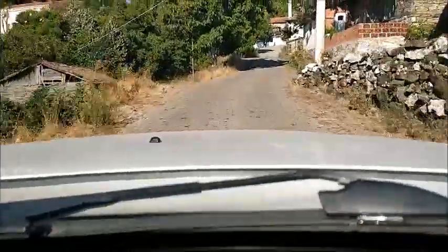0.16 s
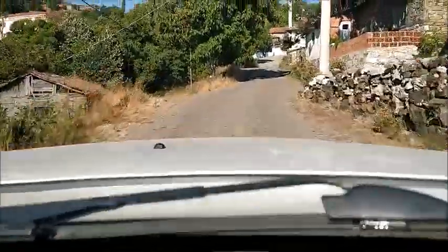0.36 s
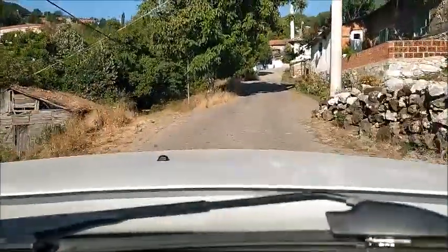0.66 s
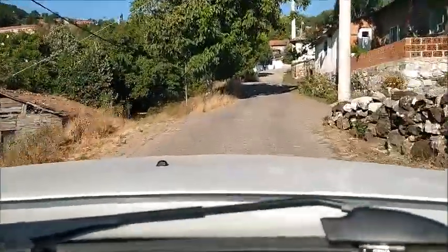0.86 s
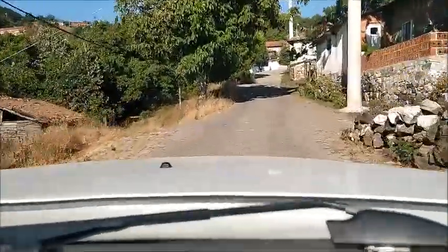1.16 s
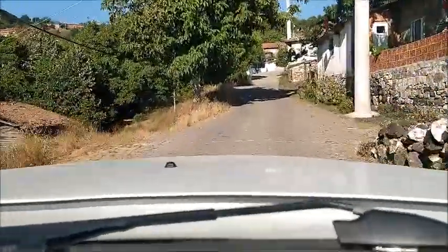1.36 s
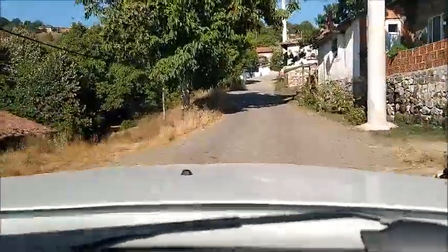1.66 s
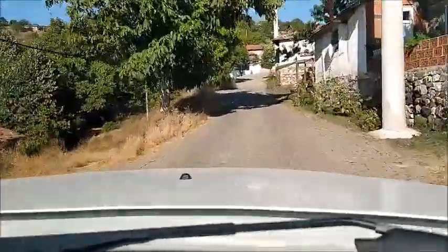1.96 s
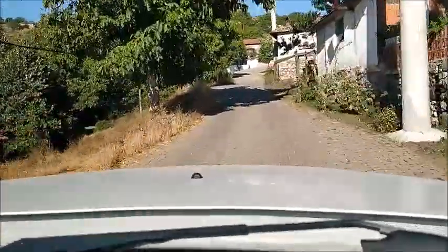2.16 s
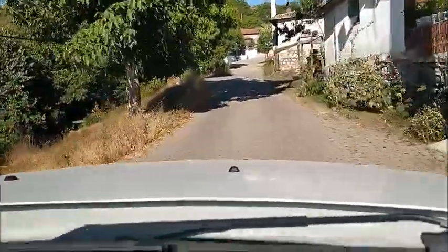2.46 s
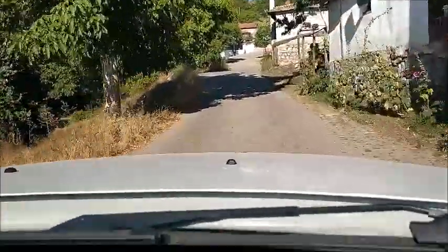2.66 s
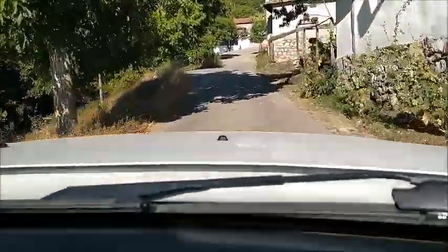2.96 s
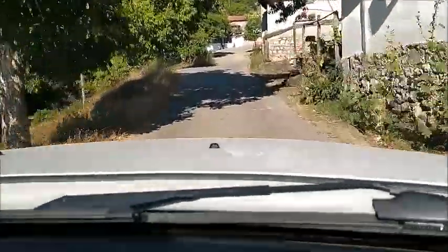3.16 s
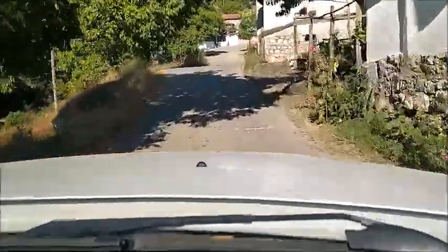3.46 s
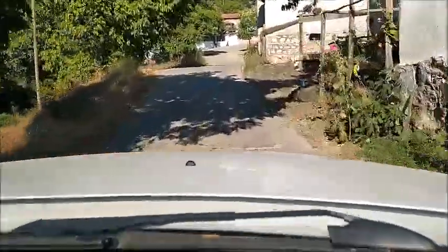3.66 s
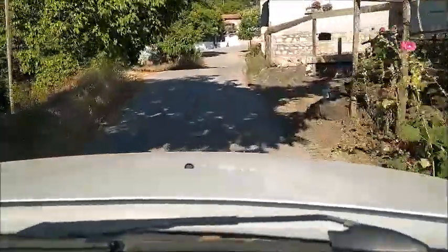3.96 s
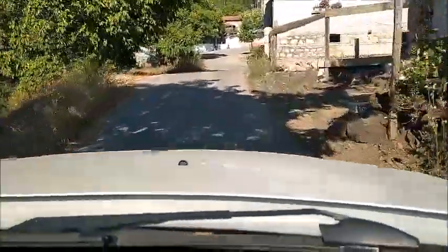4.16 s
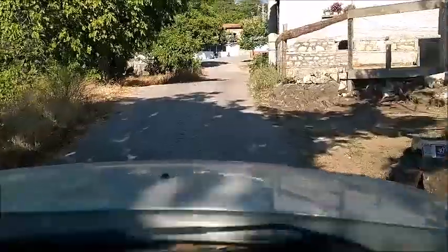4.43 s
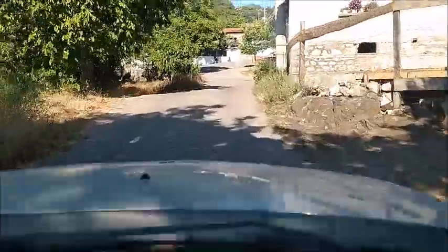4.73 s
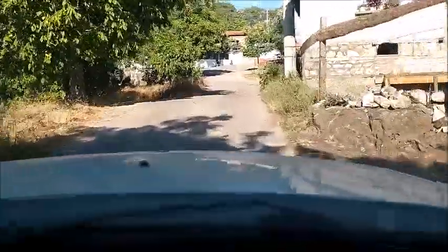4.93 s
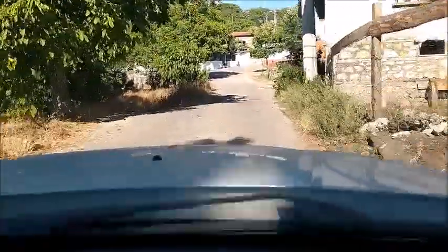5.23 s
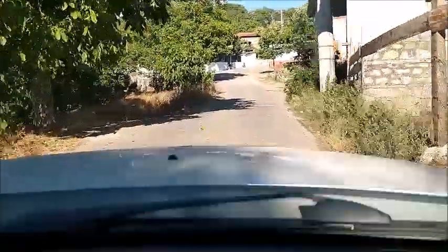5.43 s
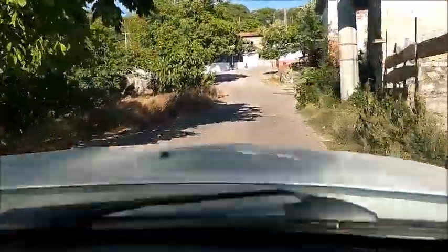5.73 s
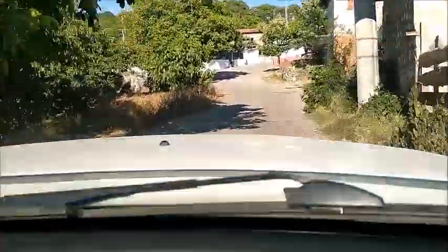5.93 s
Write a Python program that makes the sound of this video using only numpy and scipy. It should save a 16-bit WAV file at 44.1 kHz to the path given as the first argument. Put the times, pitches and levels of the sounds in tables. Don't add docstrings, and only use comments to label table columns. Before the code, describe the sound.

Deep cabin rumble of a car creeping over uneven stones, with soft suspension thuds, small plastic rattles, and a thin buzz at the end.

```python
import sys
import numpy as np
from scipy import signal
from scipy.fft import rfft, irfft
from scipy.io import wavfile
from scipy.ndimage import uniform_filter1d

SR = 44100
rng = np.random.default_rng(int(sys.argv[2]) if len(sys.argv) > 2 else 0)


def volts(x):
    e = np.asarray(x, float) / 20
    return 10 ** e


def unload_wav(signal):
    wavfile.write(
        sys.argv[1],
        SR,
        np.round(np.clip(np.atleast_2d(signal).T, -1, 1) * 32767).astype(np.int16),
    )


N = 268701
TIME = np.arange(N) / SR

# t/s, firing rate f/Hz, second order level/dB
ENGINE_SPEED = [(0, 45, -24), (.4, 45.2, -35.5), (.7, 46.11, -33), (1.5, 46.55, -36), (2.05, 49.02, -38),
                (2.8, 49.34, -36.5), (3.15, 52.03, -34), (4.0, 52.5, -52), (4.4, 51.33, -39.5),
                (4.7, 50.54, -28), (5.3, 50.4, -31.5), (5.7, 49.77, -31), (6.1, 50, -35)]
# t/s, level/dB
ENGINE_LOAD = [(0, -21), (.2, -19), (.9, -19), (1.5, -18.5), (2.25, -19), (2.6, -18.5), (3.1, -16),
               (3.4, -21.5), (3.9, -24), (4.3, -23), (4.7, -18), (5.2, -19.5), (6.1, -15)]
# multiple of the firing rate, level/dB
ENGINE_ORDERS = [(1.5, -41), (3.0, -46)]
# t/s, depth/dB, length/s
DRIVELINE_SLACK = [(0, 11, 0.065), (0.506, 13, 0.15), (1.125, 10, 0.014), (1.796, 20, 0.12),
                   (2.348, 3, 0.029), (2.913, 21, 0.031), (3.298, 6, 0.043), (3.564, 16, 0.053),
                   (4.019, 8.5, 0.046), (4.31, 13, 0.13), (4.854, 4, 0.097), (5.344, 2, 0.03)]
# t/s, level/dB, bounce f/Hz, length/s
BODY_BUMPS = [(0.294, -21.5, 31.04, 0.27), (0.706, -21.5, 36.64, 0.05), (0.948, -22.5, 33.5, 0.16),
              (1.201, -24.5, 29.72, 0.097), (1.484, -19, 28.87, 0.069), (1.87, -22, 29.11, 0.3),
              (2.17, -27, 27.03, 0.062), (2.328, -24, 29.58, 0.1), (2.638, -19, 30.96, 0.097),
              (2.942, -26, 30.4, 0.16), (3.312, -40.5, 28.51, 0.18), (3.628, -29.5, 27.34, 0.25),
              (4.055, -33.5, 32.43, 0.21), (4.41, -19.5, 29.66, 0.19), (4.853, -21.5, 29.55, 0.18),
              (5.36, -27.5, 32.93, 0.28), (5.72, -34, 33, 0.22)]
# f/Hz, level/dB per Hz
BODY_HEAVE = [(8, -16), (16, -6), (23, -10), (33, -8), (38, -2), (43, -4), (50, -12), (60, -12), (66, -30),
              (120, -120)]
# t/s, peak level/dB, ring f/Hz
SUSPENSION_THUMPS = [(0.025, -24, 94), (0.616, -12, 106), (0.782, -16, 96), (1.033, -16, 99.45),
                     (1.141, -17, 108), (1.321, -22, 119.4), (1.425, -15, 102), (1.694, -21, 98.4),
                     (1.866, -19, 107), (2.381, -10, 72), (2.486, -24, 92), (2.688, -18, 91.6),
                     (2.791, -19, 74), (2.891, -21, 86.7), (2.965, -24, 91.5), (3.146, -22, 72),
                     (3.241, -18, 72.7), (3.459, -22, 101), (4.343, -18, 107.8), (4.817, -8.5, 110.5),
                     (4.881, -25, 104.4), (5.034, -10.5, 95.6), (5.247, -9, 74), (5.749, -22, 101.6)]
# t/s, blow level/dB, floor pan over door panel level/dB, length/s
STONE_BLOWS = [(0.09, -32.5, -16, 0.04), (0.306, -26.5, 3, 0.1), (0.351, -22, 26, 0.092),
               (0.6, -31.5, 4, 0.2), (0.714, -26.5, 1, 0.044), (0.817, -26, 25, 0.047),
               (1.072, -31, 3, 0.029), (1.195, -30.5, 14, 0.063), (1.261, -31, 1, 0.043),
               (1.506, -28, 14, 0.36), (1.706, -27, 7.5, 0.11), (1.871, -31, -0.5, 0.091),
               (2.142, -24, 14, 0.079), (2.414, -31, 2.5, 0.25), (2.681, -29.5, -0.5, 0.11),
               (2.874, -26.5, 19, 0.21), (3.096, -27, 6, 0.11), (3.44, -29, 4, 0.079),
               (3.673, -26, 11, 0.044), (3.982, -26.5, 22, 0.058), (4.145, -34, -10, 0.058),
               (4.447, -21, 8, 0.092), (4.668, -27, 20, 0.055), (4.84, -24, 5, 0.11), (5.018, -27, 8, 0.1),
               (5.191, -23, 22, 0.073), (5.328, -29, 3.5, 0.13), (5.504, -32, -3, 0.097),
               (5.722, -31, 10, 0.095), (6.05, -29, 11, 0.091)]
# f/Hz, level/dB per Hz
ROAD_COLOUR = [(36, -25), (62, -33), (76, -3), (102, -8), (135, -9), (172, -7.5), (226, -14.5), (281, -20),
               (490, -28.5), (577, -29), (698, -33), (856, -27.5), (1110, -37.5), (1600, -65), (2080, -78),
               (3520, -120)]
# f/Hz, width/Hz, level/dB
PANEL_MODES = [(167.1, 16.7, 5), (223.4, 8.6, 9.5), (332.4, 33, 4), (582, 69, 4), (869, 27, 5)]
# t/s, peak level/dB, ring f/Hz, left over right level/dB
DOOR_BOOMS = [(0.258, -15, 266, -0.5), (1.394, -26, 339, 0.5), (1.448, -27, 315, 1.0), (1.669, -18, 278, 1),
              (1.859, -26, 248, 3.5), (2.01, -27, 276, 6), (2.173, -28, 282, 4), (2.286, -31, 262, 0.5),
              (2.343, -22, 250, 7.0), (2.438, -26, 320, 0), (2.69, -25, 296, 1.5), (3.025, -27, 304, 3.5),
              (3.067, -33, 250, -2), (3.265, -33, 334, -3), (3.329, -34, 250, -2.0), (3.379, -30, 244, -5),
              (4.208, -33, 357, 1.0), (4.738, -33, 250, 0.5), (5.075, -29, 307, 1.5), (5.233, -28, 247, -6)]
# t/s, peak level/dB, ring f/Hz, left over right level/dB
PANEL_CLATTER = [(1.296, -29.5, 710, -8), (2.135, -36, 767, -4), (2.586, -27, 696, 6), (2.688, -29, 695, 3),
                 (2.717, -23, 700, 2), (2.74, -32, 650, 0), (4.404, -29, 950, 11), (4.424, -31, 932, 11),
                 (4.443, -45, 946, -2), (4.464, -28, 935, -7), (4.799, -33, 625, 12), (4.824, -31, 966, 5),
                 (4.862, -30, 841, 0)]
# t/s, peak level/dB, ring f/Hz, left over right level/dB
LID_RAPS = [(0.341, -40, 1320, 10), (1.998, -29, 906, -6), (2.135, -39, 860.5, -6), (2.352, -30, 611, 0),
            (2.654, -31, 605, 4), (2.962, -29, 567, 2), (2.98, -31, 996, 0), (3.279, -35, 590, 2),
            (4.405, -40, 1211, -2), (4.423, -32, 1190, -2), (4.436, -35, 1196, 0), (4.455, -42, 1190, 0),
            (4.467, -37, 1190, 10), (4.826, -31, 1170, 1), (5.309, -35, 559.7, 3), (5.55, -40, 599, -3)]
# t/s, peak level/dB, ring f/Hz, left over right level/dB
TRIM_KNOCKS = [(0.2784, -44, 2050, 6), (0.3112, -30.5, 2660, 3), (0.3406, -33, 2600, 7),
               (0.3507, -42, 2000, 4), (0.5794, -50, 2570, 4), (0.722, -36.5, 3660, 2),
               (1.2964, -54, 2166, -1.5), (1.9956, -21.5, 1900, -10), (1.998, -35, 2476, 2),
               (2.135, -47, 2003, 2), (2.156, -35, 1986, 7), (2.5854, -42, 1957, -5),
               (2.698, -46, 2480, -2.5), (2.7194, -42, 2020, -7), (2.978, -42, 2060, -6)]
# t/s, peak level/dB, ring f/Hz, left over right level/dB
GRIT_CRACKS = [(0.2743, -45, 2130, 4), (0.284, -40, 2650, 2), (0.3474, -33.5, 2010, 4),
               (0.3534, -39.5, 2400, 10), (0.3764, -42, 2740, 0), (0.4683, -37, 2730, 3),
               (0.4903, -40, 2770, 3), (0.5104, -38, 2770, -4), (0.5601, -43, 2605, 3),
               (0.7215, -42, 2960, -3), (0.7265, -43, 4230, -1), (0.7407, -35, 2210, -5),
               (0.9317, -45, 2610, -1), (1.485, -41, 1897, 0), (1.73, -41, 1999, -7),
               (1.8113, -46, 2130, 1), (2.1624, -41, 2680, 0), (2.2847, -47, 2048, -3),
               (2.3124, -41, 1910, -7), (2.604, -43, 2150, 0), (2.6244, -49, 2228, -5),
               (2.6853, -38, 1930, 1), (2.705, -45, 3760, 2), (2.9894, -38, 2170, -1),
               (3.026, -38, 1910, -4), (4.405, -37, 2890, -2), (4.421, -39, 2274, -4),
               (4.437, -43, 2623, 1), (4.465, -41, 2654, -3), (4.8184, -57, 2720, -3),
               (4.8564, -42, 1895, -3), (5.3472, -41.5, 2024, -4), (5.5434, -44, 2001, 0)]
# t/s, peak level/dB, ring f/Hz, left over right level/dB
TRIM_TICKS = [(0.2094, -46, 8400, -11), (0.2793, -42, 7500, -5), (0.3396, -39, 8540, -10),
              (0.312, -42, 9000, -11), (0.4903, -47, 8410, -6), (0.5097, -44, 9300, -11),
              (0.7198, -51, 9500, -10.5), (0.8829, -56, 9410, -12), (0.9322, -47, 8580, -10),
              (1.1049, -38.5, 7500, -8), (1.2185, -43, 7450, -5), (1.4727, -43, 7300, -9),
              (1.6721, -43, 9100, -13), (1.715, -49, 6390, -8), (1.73, -44, 9300, -15),
              (1.8113, -43, 9310, -15), (1.8794, -45.5, 8070, -14), (2.2209, -42, 8286, -11),
              (2.6038, -42, 6700, 1), (2.6579, -41, 7400, -12), (2.6808, -41, 9600, -10),
              (2.806, -52, 9430, -2), (2.889, -47, 9300, -13), (4.374, -47, 9217, -8),
              (4.4543, -43, 8300, -8.5), (4.567, -49, 9600, -11), (4.6237, -44, 9600, -14),
              (4.8189, -53, 8770, -4), (5.3519, -47, 9600, -11), (5.5315, -41, 8100, -20)]
# t/s, peak level/dB, ring f/Hz, left over right level/dB
CLIP_PINGS = [(0.296, -51, 8550, -10), (0.733, -49, 8400, -10), (2.085, -44, 9600, -14),
              (2.102, -38, 9400, -13), (2.109, -32.5, 8630, -15.5), (2.119, -46, 9000, -13),
              (2.698, -41, 8800, -9), (2.972, -46, 9000, -10), (2.99, -42, 6540, -6),
              (3.024, -54, 9000, -10), (4.436, -45, 9900, -14), (4.455, -40, 8780, -9),
              (4.466, -43, 9200, -13), (4.82, -52, 8900, -9), (4.852, -50, 9300, -10)]
# t/s, peak level/dB, ring f/Hz, left over right level/dB
BRIGHT_TICKS = [(0.2927, -46, 11400, -15), (0.4678, -60, 11200, -11.5), (0.4898, -57, 11600, -14),
                (0.5097, -57, 10800, -12), (0.7188, -59, 10800, -14.5), (1.1049, -50, 11200, -16.0),
                (1.729, -59, 10900, -12), (1.8108, -56, 11000, -13), (1.8776, -60, 10900, -15.5),
                (1.9954, -55, 10800, -11.0), (2.6803, -56, 11000, -10), (4.5665, -55, 11200, -20),
                (4.6224, -53, 11400, -14.5), (5.5288, -60, 11400, -15.5), (5.6057, -60, 10900, -14.5),
                (5.8062, -58, 10900, -15.0), (5.9863, -61, 10900, -17.5)]
# t/s, trim rustle level/dB, dash over trim level/dB, length/s
RUSTLE_JOLTS = [(0.103, -45, -11, 0.35), (0.3, -45, -4, 0.068), (0.344, -40, -3.5, 0.015),
                (0.488, -54, -7, 0.57), (0.737, -48, -2.5, 0.052), (0.948, -47.5, -6, 0.037),
                (1.1, -54, -8, 0.049), (1.503, -58.5, -2, 0.54), (1.735, -43, -13, 0.017),
                (1.88, -49, -4.5, 0.088), (2.004, -45, -9, 0.034), (2.078, -45.5, -10.5, 0.078),
                (2.17, -47.5, -4.5, 0.026), (2.305, -55, -5, 0.24), (2.62, -45.5, -3.5, 0.034),
                (2.7, -45, -2, 0.048), (2.811, -44, -12, 0.018), (2.988, -44.5, -5, 0.072),
                (3.164, -50, -8, 0.069), (4.45, -43, -6.5, 0.074), (4.535, -56, -13, .06),
                (4.832, -46, -4, 0.079), (5.54, -50.5, -6, 0.02), (5.717, -64, 6, .1),
                (6.09, -49, -13, .02)]
# f/Hz, level/dB per Hz
RUSTLE_COLOUR = [(760, -9), (1300, -1.5), (1530, -5.5), (1660, -4.5), (1810, -3.5), (2070, -4.5),
                 (2390, -9), (2640, -6), (3490, -12.5), (5270, -13.5), (7890, -11), (9190, -9.5),
                 (11100, -20), (14400, -35), (22000, -120)]
CLIP_BUZZ = [
    (5.62, -74, 5),
    (5.66, -66.5, 6),
    (5.72, -60.5, 3),
    (5.8, -61, 22),
    (5.9, -67, 17),
    (5.97, -67, 6),
    (5.985, -61, -1.5),
    (6.1, -60.5, -3),
]
# f/Hz, width/Hz, level/dB
CLIP_MODES = [(7400, 494, -3), (8450, 330, -3.5), (9600, 500, -2), (5860, 360, -5)]
# f/Hz, level/dB per Hz
AIR_COLOUR = [(590, -41), (1000, 6.5), (1370, -7.5), (2190, -6.5), (3030, -17.5), (3250, -21.5),
              (3860, -12.5), (4220, -22), (5430, -23), (5830, -19.5), (8210, -23.5), (9350, -20),
              (10400, -27), (11100, -73), (14400, -64), (22000, -120)]
# f/Hz, left-right likeness (1 = same)
PORT_LIKENESS = [(60, .997), (125, .987), (200, .96), (300, .77), (440, .6), (660, .45), (1100, .33),
                 (1900, .26), (3220, .1), (5000, 0)]
# f/Hz, left over right level/dB
PORT_BALANCE = [(60, 0), (100, .6), (300, .4), (440, -1.2), (980, 1.5), (2160, -1), (3220, -.5), (4800, -2),
                (7150, -7), (9300, -13), (10600, -13), (12500, -4)]
# f/Hz, left port lead/rad
PORT_LEAD = [(10, 0), (50, -.11), (130, -.2), (430, -.2), (690, -.4), (880, -1.1), (1120, -3.7),
             (1900, -3.1)]


def engine():
    s, depth_db, length = np.transpose(DRIVELINE_SLACK)
    dips = np.exp(-swells(s, length, rise=0.82) ** 1.06)
    slack_db = fine((depth_db[:, None] * dips).sum(0))
    firing_hz, second_db = curves(ENGINE_SPEED)
    turns = np.cumsum(firing_hz) / SR
    hum = volts(curves(ENGINE_LOAD)[0] - slack_db) * np.sin(2 * np.pi * turns)
    for order, db in ENGINE_ORDERS + [(2, second_db)]:
        waver = evened(uniform_filter1d(rng.standard_normal(N), 6000))
        hum += volts(db + 2.4 * waver) * np.sin(2 * np.pi * (order * turns + rng.random()))
    return np.sqrt(2) * hum


def body():
    s, db, bounce_hz, length = np.transpose(BODY_BUMPS)
    shape = swells(s, length, rise=1)
    nearness = 1 / (1 + shape) ** 2
    hz = fine(bounce_hz @ nearness / nearness.sum(0))
    ring = np.sqrt(2) * np.sin(2 * np.pi * np.cumsum(hz) / SR)
    loose = volts(0.5) * steadied(ports(lambda f: 0 * f, 23, 38.7), 0.18)[1]
    heave = volts(-25.5) * steadied(ports(lambda f: read(BODY_HEAVE, f)), 0.84)[1]
    return piled(db, shape, rest_db=-40) * (ring + loose) + heave


def thumps():
    rise_s, t60_s, level_db = 0.014, 0.23, -2.5
    out, t = np.zeros((1, N)), np.arange(SR // 4)[None] / SR
    for (s, db, hz), phase in zip(SUSPENSION_THUMPS, rng.random(len(SUSPENSION_THUMPS))):
        swell = 1 - np.exp(-(t / rise_s) ** 2)
        shape = swell * volts(level_db + db - 60 * t / t60_s)
        add(out, s, shape * np.sin(2 * np.pi * (hz * t + phase)))
    return out[0]


def road():
    def colour_db(hz):
        modes_db = sum(db / (1 + (2 * (hz - f) / w) ** 2) for f, w, db in PANEL_MODES)
        return read(ROAD_COLOUR, hz) + modes_db
    s, db, lean_db, length = np.transpose(STONE_BLOWS)
    shape = swells(s, length, rise=1)
    floor_db = db + np.minimum(lean_db, 0)
    door_db = db - np.maximum(lean_db, 0)
    thud = piled(db - 9, shape, -28.5) * steadied(ports(colour_db, 66, 144), 0.12)
    floor = piled(floor_db + 0.062, shape, -35.5) * steadied(ports(colour_db, 150.5, 175.4), 0.049)
    door = piled(door_db + 0.24, shape, -34) * steadied(ports(colour_db, 189, 288), 0.073)
    roar = piled(door_db - 9, shape, -38.13) * steadied(ports(colour_db, 275.0, 1680), 0.058)
    return thud + floor + door + roar


def panel_raps():
    booms = volts(-2.5) * taps(DOOR_BOOMS, 0.1, 0.21, -27, [250, 900], 0.0027, count=3)
    clatter = taps(PANEL_CLATTER, 0.047, 0.713, -10.5, [600, 2500], 0.0026, count=12)
    raps = taps(LID_RAPS, 0.057, 0.296, -10, [600, 2500], 0.0013, count=7)
    return booms + clatter + raps


def trim_ticks():
    knocks = taps(TRIM_KNOCKS, 0.016, 0.13, -22, [1300, 4000])
    grit = volts(-0.5) * taps(GRIT_CRACKS, 0.02, 0.46, -7.5, [1500, 8500], count=7)
    ticks = taps(TRIM_TICKS, 0.013, 0.14, -8.0, [5500, 12800])
    pings = taps(CLIP_PINGS, 0.027, 0.084, -13, [6000, 14000])
    sparks = volts(-1) * taps(BRIGHT_TICKS, 0.008, 0.2, -5, [9000, 14000])
    return knocks + grit + ticks + pings + sparks


def taps(rows, t60_s, spread, snap_db, snap_hz, rise_s=.0004, count=5):
    out, t = np.zeros((2, N)), np.arange(2500) / SR
    draws = rng.random((len(rows), 2, 2, count, 1))
    band = signal.butter(2, snap_hz, "bandpass", fs=SR, output="sos")
    snaps = evened(signal.sosfilt(band, rng.standard_normal((len(rows), 2, len(t)))))
    places = np.arange(count)[:, None]
    for (s, db, hz, pan_db), (jitter, phase), snap in zip(rows, draws, snaps):
        modes_hz = hz * (1 + spread * ((places + jitter) / count - .5))
        ring = np.sin(2 * np.pi * (modes_hz * t + phase)).sum(1) / np.sqrt(count)
        sound = ring * volts(-60 * t / t60_s) + snap * volts(snap_db - 60 * t / 0.0094)
        gain = volts(db + pan_db * np.array([[.5], [-.5]]))
        add(out, s, gain * sound * np.minimum(t / rise_s, 1))
    return out


def rustle():
    split_hz, hits_per_s, puff_s = 5200, 260, 0.003
    s, db, dash_db, length = np.transpose(RUSTLE_JOLTS)
    shape = swells(s, length, rise=0.81)
    sizes = volts(5.2 * np.minimum(rng.exponential(1, N), 4))
    hits = sizes * (rng.random(N) < hits_per_s / SR)
    puffs = signal.lfilter([1], [1, -np.exp(-1 / (puff_s * SR))], hits)
    chatter = evened(1.05 + puffs / 3)
    dash = ports(lambda f: read(RUSTLE_COLOUR, f), 1210, split_hz)
    trim = ports(lambda f: read(RUSTLE_COLOUR, f), split_hz)
    dash_gain = (0.39 + .5 * chatter) * piled(db + dash_db - 0.6, shape, rest_db=-55.5)
    trim_gain = chatter * piled(db - 9.5, shape, rest_db=-65.5)
    return dash_gain * dash + trim_gain * trim


def buzz():
    first_slap_s, slaps_per_s, whine_hz, whine_db = 5.728, 50, 5920, -9

    def colour_db(hz):
        return 10 * np.log10(sum(volts(2 * db) / (1 + (2 * (hz - f) / w) ** 2) for f, w, db in CLIP_MODES))
    db, uneven_db = curves(CLIP_BUZZ)
    on = TIME > CLIP_BUZZ[0][0]
    since = (TIME - first_slap_s) * slaps_per_s % 2
    slap = np.exp(-(since % 1) / 0.46) * volts(db - uneven_db * (since > 1)) * on
    whine = volts(db + whine_db) * np.sin(2 * np.pi * whine_hz * TIME) * on
    return 4.08 * slap * ports(colour_db, 4500, 10800) + whine


def air():
    return volts(-55) * ports(lambda f: read(AIR_COLOUR, f), 1260)


def ports(colour_db, lo_hz=0., hi_hz=30000.):
    hz = np.fft.rfftfreq(N, 1 / SR)
    a, b = rfft(rng.standard_normal((2, N)))
    same = np.clip(read(PORT_LIKENESS, hz), -1, 1)
    band = 1 / np.sqrt((1 + (lo_hz / (hz + 1)) ** 10) * (1 + (hz / hi_hz) ** 10))
    right = same * a * np.exp(-1j * read(PORT_LEAD, hz)) + np.sqrt(1 - same ** 2) * b
    z = np.array([a, right]) * volts(colour_db(hz)) * band
    x = irfft(z * volts(read(PORT_BALANCE, hz) * [[.5], [-.5]]), N)
    return x / x.mean(0).std()


def steadied(x, s):
    size = int(s * SR)
    power = uniform_filter1d(uniform_filter1d(x.mean(0) ** 2, size), size)
    return x / np.sqrt(power + 0.022)


def swells(s, length, rise):
    late = (TIME[::44] - s[:, None]) / length[:, None]
    return np.where(late < 0, late / rise, late) ** 2


def piled(db, shape, rest_db):
    power = volts(2 * (db[:, None] - 12 * shape)).sum(0)
    return fine(np.sqrt(volts(2 * rest_db) + power))


def fine(x):
    return np.interp(TIME, TIME[::44], x)


def curves(rows):
    s, *columns = np.transpose(rows)
    return [np.interp(TIME, s, c) for c in columns]


def read(points, hz):
    f, value = np.transpose(points)
    return np.interp(np.log(hz + 1), np.log(f + 1), value)


def evened(x):
    return x / np.sqrt(np.mean(x ** 2) + 1e-20)


def add(mix, s, sound):
    part = mix[:, round(s * SR):][:, :sound.shape[1]]
    part += sound[:, :part.shape[1]]


def scene():
    low = engine() + body() + thumps()
    late = np.pad(low, (16, 0), "edge")[:N]
    bass = np.array([late, low])
    return bass + road() + panel_raps() + trim_ticks() + rustle() + buzz() + air()


def low_pass(x):
    return signal.sosfilt(signal.butter(12, 14950, fs=SR, output="sos"), x)


def record(dry):
    return low_pass(dry)


dry = scene()
out = record(dry)
unload_wav(out)
```